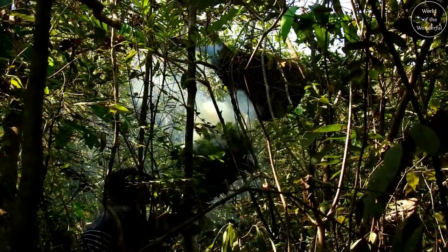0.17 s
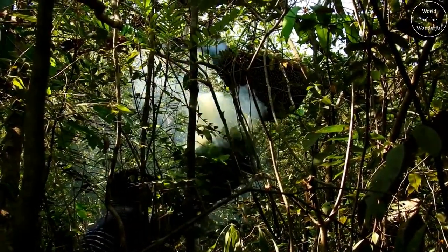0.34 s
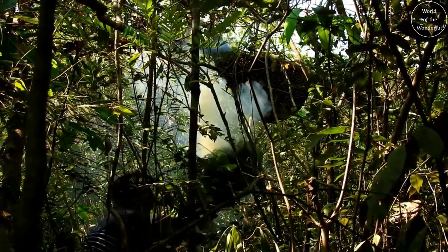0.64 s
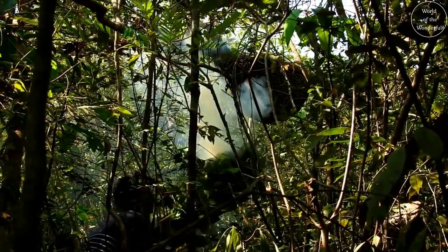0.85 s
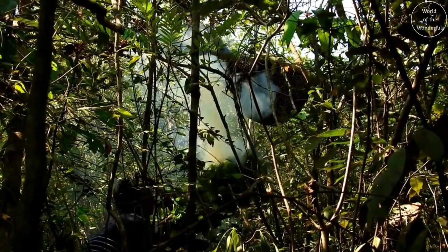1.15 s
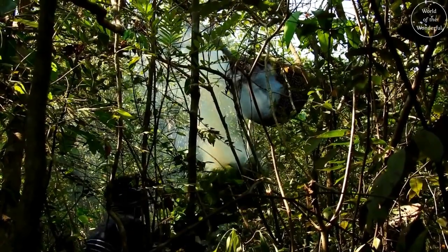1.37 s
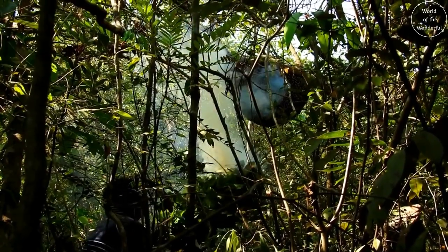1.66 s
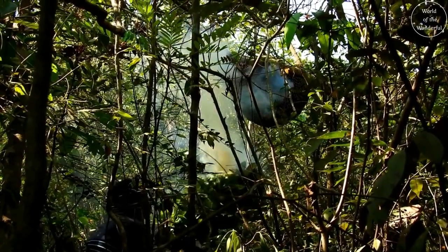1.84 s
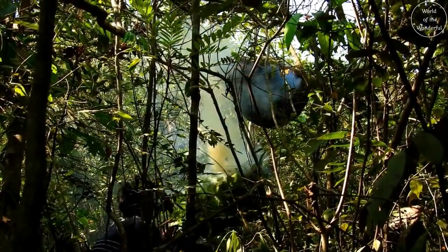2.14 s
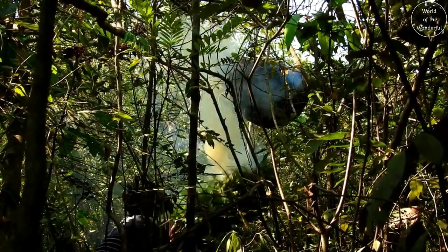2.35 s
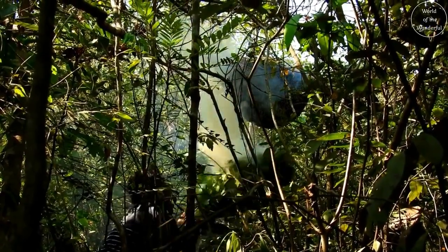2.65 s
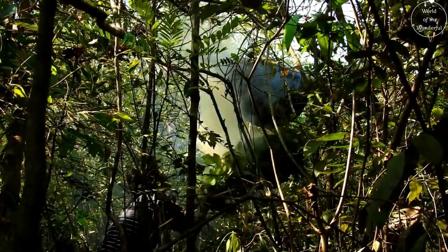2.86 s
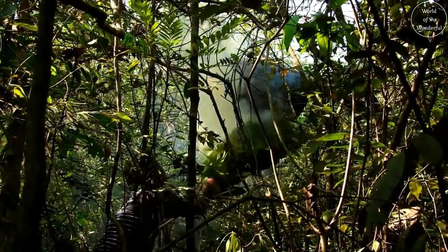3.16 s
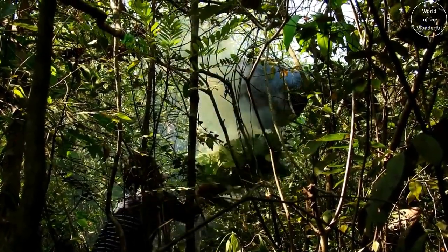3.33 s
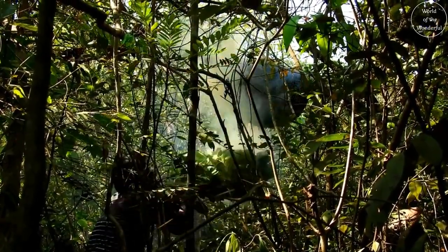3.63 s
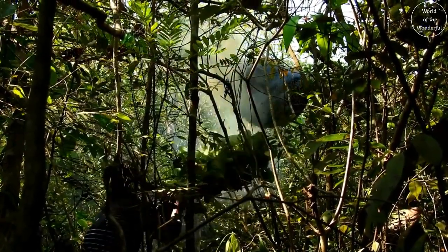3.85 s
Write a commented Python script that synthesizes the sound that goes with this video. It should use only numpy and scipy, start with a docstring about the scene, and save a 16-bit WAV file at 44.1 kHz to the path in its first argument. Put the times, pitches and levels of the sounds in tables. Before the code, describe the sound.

Leafy boughs swish and rustle with a few sharp twig snaps over steady woodland hiss.

```python
"""Woodland hiss, a low rumble with a hum, a swarm's drone and a fading cricket; then boughs swish and twigs snap.
Hiss and rumble are coloured noise in flickering bands; the hum is one sine that drifts in pitch.
The swarm sums drifting wing tones with overtones; the cricket is a few trembling, throbbing lines.
A leafy bundle being lifted is dense noise grains in gusts; snaps are decaying modes, a knock and a leaf shower.
The recorder passes its treble a little late and cuts the top."""
import sys
import numpy as np
from scipy import signal
from scipy.fft import rfft, irfft
from scipy.io import wavfile
from scipy.ndimage import uniform_filter1d

SR = 44100
rng = np.random.default_rng(int(sys.argv[2]) if len(sys.argv) > 2 else 0)


def digitize_waveform(pressure):
    """Quantize a signal to 16-bit integers and store it at the path in sys.argv[1].

    Rows of a 2-D input are taken as channels; values are limited to [-1, 1].
    """
    field = np.atleast_2d(pressure).T
    bounded = np.clip(field, -1, 1)
    quanta = np.round(bounded * 32767).astype(np.int16)
    wavfile.write(sys.argv[1], SR, quanta)


N = 176400


def undb(db):
    """Amplitude ratio of a level in dB."""
    return 10 ** (np.asarray(db) / 20)


def unit(x):
    """Scale to an RMS of 1."""
    return x / np.sqrt(np.mean(x ** 2))


def curve(rows, column=1):
    """A table column joined by straight lines in time."""
    rows = np.array(rows)
    return np.interp(np.arange(N) / SR, rows[:, 0], rows[:, column])


def on_log(table, hz):
    """Value of a (frequency [Hz], value) table at hz, on a log frequency axis."""
    table = np.array(table)
    return np.interp(np.log(np.maximum(hz, 1)), np.log(table[:, 0]), table[:, 1])


def walk(rate_hz):
    """Random levels held 1 / rate_hz s and slewed twice; RMS 1."""
    hold = int(SR / rate_hz)
    steps = np.repeat(rng.standard_normal(N // hold + 1), hold)
    slewed = uniform_filter1d(uniform_filter1d(steps, hold), hold)[:N]
    return unit(slewed - slewed.mean())


def bin_hz():
    """Frequencies of the spectrum bins."""
    return np.arange(N // 2 + 1) * SR / N


def shape(x, gain):
    """Filter by a gain given as a function of Hz."""
    return irfft(rfft(x) * gain(bin_hz()), N)


def band_weight(place, k):
    """Raised-cosine weight of band k; neighbouring bands sum to 1."""
    return np.cos(np.pi / 2 * np.clip(place - k, -1, 1)) ** 2


def spread(mid, side, left_db):
    """Left and right from mid and side, leaning left by left_db."""
    return np.array([mid + side, mid - side]) * undb(np.array([[left_db], [-left_db]]) / 2)


def tone(hz):
    """Sine of RMS 1 at a varying pitch, from a random phase."""
    return np.sqrt(2) * np.sin(2 * np.pi * (np.cumsum(hz) / SR + rng.random()))


# background spectrum: (frequency [Hz], relative density [dB per Hz])
WOOD_COLOUR = [(20, -48), (35, -17), (46, -10.5), (69, 0), (91, -3.5), (173, -7.5), (313, -24.5),
               (500, -26), (761, -29), (996, -27.5), (1400, -31), (2000, -31), (3000, -32), (4600, -28.5),
               (7100, -26.5), (8300, -35.5), (9500, -46), (11500, -53.5), (15500, -63.5)]
# background width: (frequency [Hz], side against mid [dB])
WOOD_WIDTH = [(60, -15), (110, -10), (200, -10), (380, -9), (700, -9), (1290, -10), (2380, -8), (4400, -7),
              (8120, -7), (15000, 2)]
# background gain: (time [s], hiss [dB], middle [dB], rumble [dB])
WOOD_GAIN = [(0, 2.5, 1, 1), (.4, 2, 2.5, 0), (.55, 2, -1, -0.5), (.65, 1, 3.5, 1.5), (.85, 0, 1, 1),
             (1.0, -1, 1, 0.5), (1.35, -0.5, 0.5, 1.5), (1.6, 1.5, 1.5, -5), (1.8, 1.5, 0.5, -2),
             (2.3, 3, 2.5, 5), (2.7, 5, 4, 1.5), (2.95, 1.5, 1, 1), (3.07, 5, -1.5, 2.5), (3.13, 3, 8, -1),
             (3.22, 3, 3, -3), (3.35, 5, 9, -1.5), (3.5, 7.5, 7, -0.5), (4, 3.5, -1.5, -3.5)]
WOOD_DB = -36  # before WOOD_GAIN
RUMBLE_TOP_HZ, MIDDLE_TOP_HZ, HISS_LEFT_DB = 280, 1200, 0.1
SWAY_DB, FLICKER_DB, MIDDLE_FLICKER_DB = .6, 1.2, 2.4


def wood():
    """Half-octave noise bands flicker alone; those above the rumble also sway together."""
    hz = bin_hz()
    noise = rfft(rng.standard_normal((2, N)))  # mid, side
    noise = noise * undb(on_log(WOOD_COLOUR, hz)) * undb([0 * hz, on_log(WOOD_WIDTH, hz)])
    noise = noise / np.sqrt(np.mean(irfft(noise[0], N) ** 2))
    sway_db = SWAY_DB * walk(7.21)
    place = 2 * np.log2(np.maximum(hz, 1) / 20)
    out = 0
    for k in range(20):
        centre_hz = 20 * 2 ** (k / 2)
        if centre_hz < RUMBLE_TOP_HZ:
            column, flicker_db, shared_db, left_db = 3, FLICKER_DB, 0, 0
        elif centre_hz < MIDDLE_TOP_HZ:
            column, flicker_db, shared_db, left_db = 2, MIDDLE_FLICKER_DB, sway_db, HISS_LEFT_DB
        else:
            column, flicker_db, shared_db, left_db = 1, FLICKER_DB, sway_db, HISS_LEFT_DB
        mid, side = irfft(noise * band_weight(place, k), N)
        level_db = curve(WOOD_GAIN, column) + flicker_db * walk(12) + shared_db
        out = out + spread(mid, side, left_db) * undb(level_db)
    return out * undb(WOOD_DB)


HUM_HZ, HUM_WANDER_RATIO, HUM_DB = 64.3, 0.023, -39.5


def hum():
    """A steady low sine that wavers in pitch."""
    return tone(HUM_HZ * (1 + HUM_WANDER_RATIO * walk(5.4))) * undb(HUM_DB)


# swarm drone: (time [s], level [dB])
SWARM_LEVEL = [(0.0, -52), (0.21, -50.5), (0.33, -66), (0.37, -53), (0.48, -64), (0.62, -53.5),
               (0.7, -49.5), (0.8, -43), (0.88, -46.5), (1.0, -56), (1.09, -47.5), (1.2, -53), (1.35, -60),
               (1.67, -71), (1.89, -45.5), (1.97, -61.5), (2.76, -49), (2.86, -91), (3.09, -54),
               (3.15, -36.5), (3.19, -52), (3.23, -38), (3.28, -45), (3.32, -54), (3.4, -46), (3.46, -46),
               (3.52, -57), (3.63, -48), (3.66, -49), (3.71, -47), (3.77, -61), (3.87, -50), (4.0, -70)]
# wing overtones: (multiple of the pitch, relative level [dB])
WING_OVERTONES = [(1, 3.5), (2, -15), (3, -10)]
SWARM_HZ, SWARM_SPREAD_RATIO, SWARM_WANDER_RATIO = 358, .05, .035
SWARM_SURGE_DB, SWARM_SURGE_HZ = 4, 22


def swarm():
    """Nine wing tones at nearby, drifting pitches, each placed elsewhere and coming and going."""
    out = 0
    for offset, pan in rng.standard_normal((9, 2)):
        hz = SWARM_HZ * (1 + SWARM_SPREAD_RATIO * offset + SWARM_WANDER_RATIO * walk(12))
        wing = sum(undb(db) * tone(multiple * hz) for multiple, db in WING_OVERTONES)
        wing = wing * undb(SWARM_SURGE_DB * walk(SWARM_SURGE_HZ))
        out = out + spread(wing, 0.15 * pan * wing, 0)
    return unit(out) * undb(curve(SWARM_LEVEL))


# cricket: (time [s], main line level [dB], pitch [Hz])
CRICKET_SONG = [(0, -53, 5280), (.15, -50, 5300), (.3, -48.5, 5310), (.45, -52.5, 5400), (.6, -54, 5400),
                (.8, -62, 5380), (1.0, -63, 5370), (1.3, -66, 5400), (1.6, -80, 5400)]
# cricket lines: (multiple of the pitch, relative level [dB])
CRICKET_LINES = [(1, 0), (1.075, -9), (.84, -7), (.495, -11)]
CRICKET_THROB_DB, CRICKET_THROB_HZ, CRICKET_LEFT_DB = 3, 100, -5.0
CRICKET_JITTER_RATIO, CRICKET_JITTER_HZ = .011, 800


def cricket():
    """A few narrow lines, trembling in pitch and throbbing in level, to the right."""
    out = 0
    for multiple, line_db in CRICKET_LINES:
        jitter = 1 + CRICKET_JITTER_RATIO * walk(CRICKET_JITTER_HZ)
        hz = multiple * curve(CRICKET_SONG, column=2) * jitter
        throb_db = CRICKET_THROB_DB * walk(CRICKET_THROB_HZ)
        out = out + tone(hz) * undb(line_db + curve(CRICKET_SONG) + throb_db)
    return spread(out, 0 * out, CRICKET_LEFT_DB)


PATCHY_DB, PATCHY_HZ = 2.1, 70


def patchy(x):
    """Quarter-octave bands flicker quickly and alone: leaves of different size crackle by turns."""
    spectrum = rfft(x)
    place = np.clip(4 * np.log2(np.maximum(bin_hz(), 1) / 250), 0, 23)
    out = 0
    for k in range(24):
        out = out + irfft(spectrum * band_weight(place, k), N) * undb(PATCHY_DB * walk(PATCHY_HZ))
    return out


# leaf spectrum: (frequency [Hz], gain [dB])
LEAF_COLOUR = [(200, -9), (500, -13), (800, -14.5), (1330, -12), (2130, -9), (3240, -7.5), (5000, -3),
               (7080, 0.5), (8300, -9.5), (9500, -20.5), (11600, -36.5), (15500, -56)]
# leaf width: (frequency [Hz], side against mid [dB])
LEAF_WIDTH = [(300, -13), (1500, -17), (3000, -12), (6000, -9.5), (8500, -6), (14000, 3)]
GRAINS_PER_S, GRAIN_SPREAD_DB, GRAIN_ENERGY_DECAY_S = 6000, 1.5, .0007
LEAF_LEFT_DB, BODY_TOP_HZ = 0.33, 3730


def leaves():
    """Dense leaf clicks of uneven size, smeared into brief noise: (body, treble), each left and right."""
    hit = rng.random((2, N)) < GRAINS_PER_S / SR
    clicks = hit * undb(GRAIN_SPREAD_DB * rng.exponential(size=(2, N)))
    tail = np.exp(-np.arange(400) / SR / GRAIN_ENERGY_DECAY_S)
    energy = signal.fftconvolve(clicks ** 2, tail[None])[:, :N]
    mid, side = np.sqrt(np.maximum(energy, 0)) * rng.standard_normal((2, N))
    side = shape(side, lambda f: undb(on_log(LEAF_WIDTH, f)))
    both = shape(spread(mid, side, LEAF_LEFT_DB), lambda f: undb(on_log(LEAF_COLOUR, f)))
    both = unit(patchy(both))
    body = shape(both, lambda f: 1 / (1 + (f / BODY_TOP_HZ) ** 4))
    return body, both - body


# moving boughs: (time [s], level [dB], extra body below the treble [dB])
SWISH_GUSTS = [(1.7, -62, 10), (1.8, -44, 3), (1.85, -30.5, -1), (1.89, -26, -1), (1.94, -30, -8),
               (2.01, -43, 8), (2.3, -44.5, 1.5), (2.55, -42, -14), (2.61, -40, -15), (2.66, -31, -14),
               (2.72, -36, -4), (2.79, -38.5, -12), (2.96, -36, -1.5), (3.06, -28.5, -4), (3.14, -33, -9),
               (3.31, -38.5, -11), (3.36, -32, -2), (3.405, -25.5, -7), (3.46, -30.5, 1),
               (3.54, -26.5, -3.5), (3.585, -19, -3.5), (3.628, -13.5, -5.5), (3.66, -22, -9),
               (3.70, -28, -2.5), (3.76, -30, -5), (3.79, -27.5, -16), (3.835, -28, -0.5),
               (3.862, -19.5, -3.5), (3.928, -17, -2.5), (3.96, -19, -2), (4.0, -23.5, -10)]
FADE_IN_S, SWISH_FLUTTER_DB, SWISH_FLUTTER_HZ = .05, 1.0, 30.044


def swish():
    """The boughs sweep through the undergrowth: leaf noise follows gusts in level and body."""
    body, treble = leaves()
    fade = np.clip((np.arange(N) / SR - SWISH_GUSTS[0][0]) / FADE_IN_S, 0, 1)
    level_db = curve(SWISH_GUSTS) + SWISH_FLUTTER_DB * walk(SWISH_FLUTTER_HZ)
    return fade * undb(level_db) * (treble + body * undb(curve(SWISH_GUSTS, column=2)))


# twig snaps: (time [s], crack gain [dB], shower gain [dB], mode gain away from the centre [dB/octave],
#              knock pitch [Hz], knock gain [dB])
TWIG_SNAPS = [(2.3405, -10.5, -16, -1, 1050, -20), (2.4496, -15.5, -20.5, -0.5, 1050, -23),
              (2.7174, -21, -25, 1, 1020, -23), (3.451, -18, -29, -3, 1680, -17.5),
              (3.853, -27, -25.5, 0, 1030, -32)]
# twig modes: (frequency [Hz], gain [dB], T60 [s])
TWIG_MODES = [(1450, 6, .0038), (2800, 4.5, .0032), (1050, -6, .014), (1700, -9, .01), (2300, -8, .009),
              (3400, -9, .012), (5200, -3, .011), (6900, 0, .013)]
TWIG_CENTRE_HZ, TWIG_ATTACK_S, TWIG_DETUNE_RATIO = 1500, .00025, 0.043
KNOCK_T60_S, SHOWER_T60_S, SHOWER_BODY_DB, SNAP_TOP_HZ = .016, 0.18, -2, 8800


def snaps():
    """Each twig cracks in damped modes, knocks at its own pitch and shakes loose a short leaf shower."""
    body, treble = leaves()
    t, ring, shower = np.arange(N) / SR, 0, 0
    detunes = rng.standard_normal((len(TWIG_SNAPS), len(TWIG_MODES)))
    for snap, detune in zip(TWIG_SNAPS, detunes):
        at_s, crack_db, shower_db, slope_db, knock_hz, knock_db = snap
        age = np.maximum(t - at_s, 0)
        crack = 0
        for (hz, gain_db, t60_s), d in zip(TWIG_MODES, detune):
            mode_db = gain_db + slope_db * abs(np.log2(hz / TWIG_CENTRE_HZ)) - 60 * age / t60_s
            crack = crack + undb(mode_db) * np.sin(2 * np.pi * hz * (1 + TWIG_DETUNE_RATIO * d) * age)
        knock = undb(knock_db - 60 * age / KNOCK_T60_S) * np.sin(2 * np.pi * knock_hz * age)
        attack = 1 - np.exp(-age / TWIG_ATTACK_S)
        ring = ring - (undb(crack_db) * crack + knock) * attack
        shower = shower + (t > at_s) * undb(shower_db - 60 * age / SHOWER_T60_S)
    both = spread(ring, 0 * ring, 0) + shower * (treble + undb(SHOWER_BODY_DB) * body)
    return signal.sosfilt(signal.butter(3, SNAP_TOP_HZ, fs=SR, output="sos"), both)


def scene():
    """Sum of all sources, left and right."""
    return wood() + hum() + swarm() + cricket() + swish() + snaps()


SPLIT_HZ, SPLIT_WIDTH_HZ, TREBLE_LAG_S, TOP_HZ = 3995, 150, .0108, 15630


def record(dry):
    """The treble above the split comes out late; the top is cut."""
    low = shape(dry, lambda f: np.clip((SPLIT_HZ - f) / SPLIT_WIDTH_HZ + .5, 0, 1))
    treble = dry - low
    lag = int(TREBLE_LAG_S * SR)
    # mirrored treble fills the lag at the start
    late = np.concatenate([treble[:, lag:0:-1], treble[:, :-lag]], axis=1)
    return signal.sosfilt(signal.ellip(8, .2, 70, TOP_HZ, fs=SR, output="sos"), low + late)


dry = scene()
out = record(dry)
digitize_waveform(out)
```